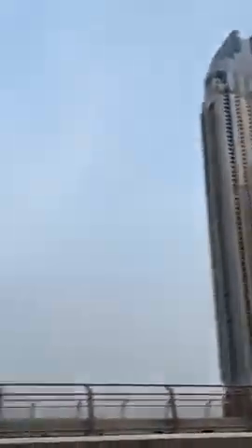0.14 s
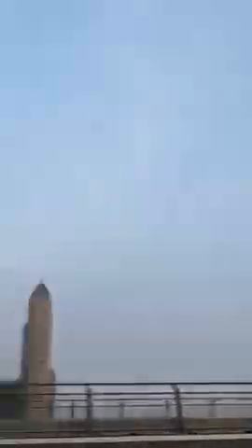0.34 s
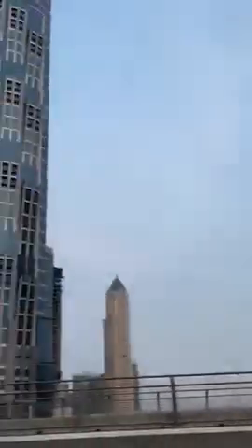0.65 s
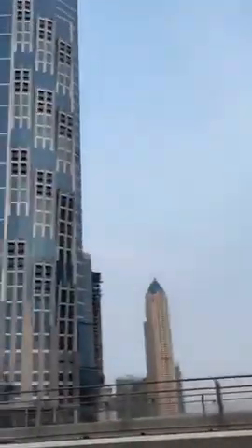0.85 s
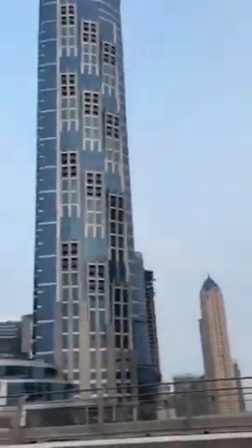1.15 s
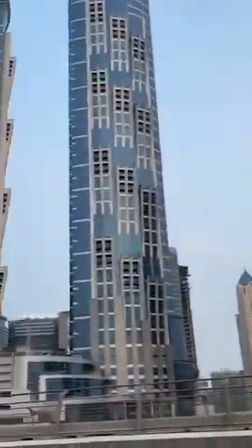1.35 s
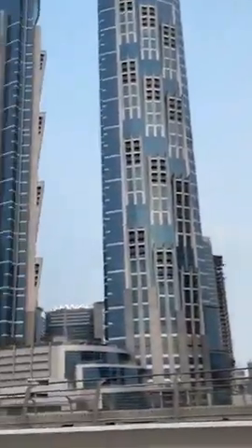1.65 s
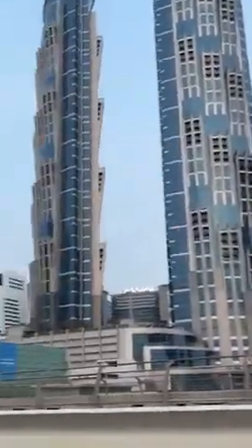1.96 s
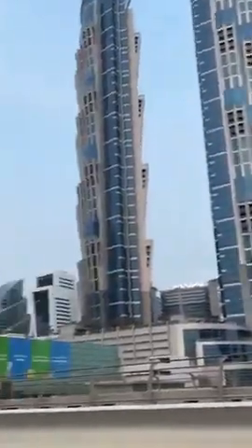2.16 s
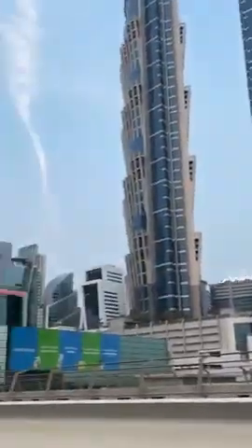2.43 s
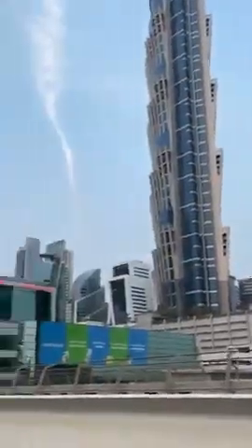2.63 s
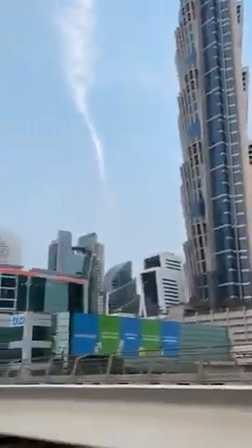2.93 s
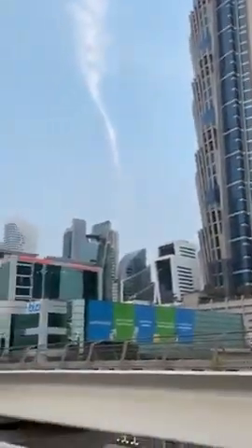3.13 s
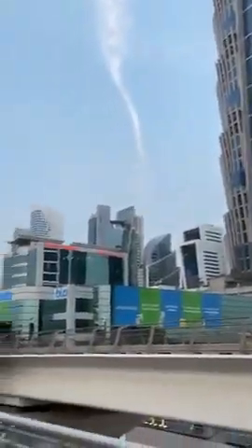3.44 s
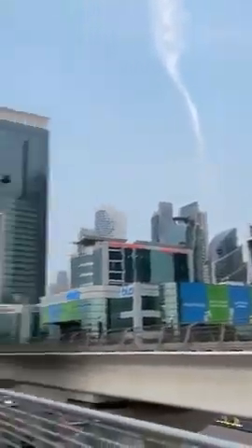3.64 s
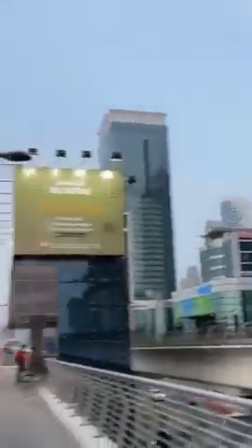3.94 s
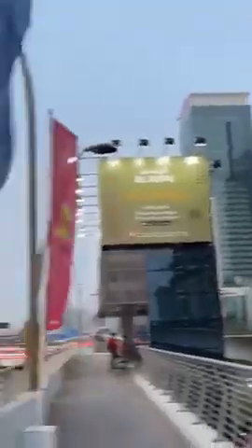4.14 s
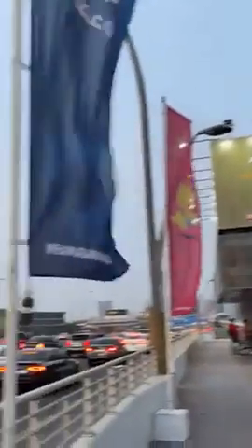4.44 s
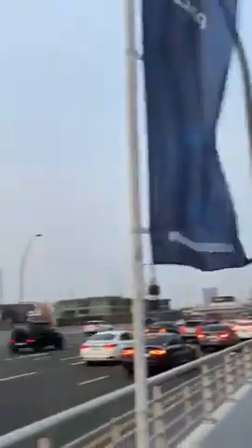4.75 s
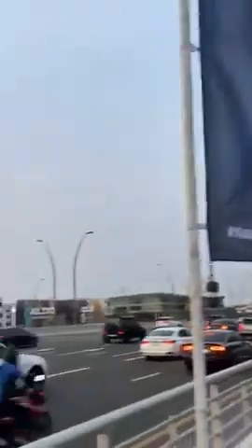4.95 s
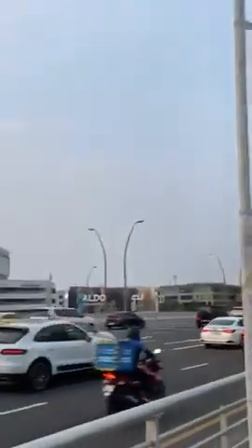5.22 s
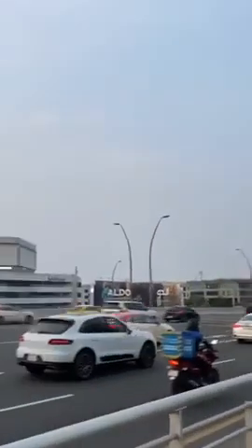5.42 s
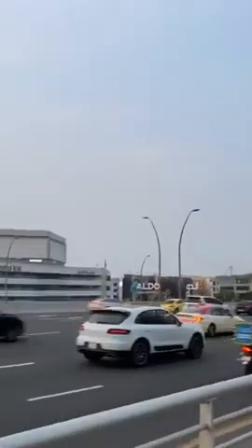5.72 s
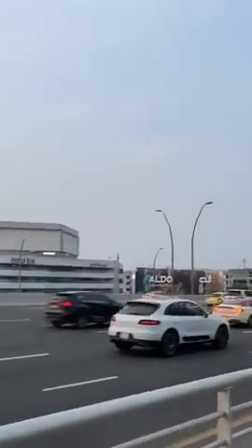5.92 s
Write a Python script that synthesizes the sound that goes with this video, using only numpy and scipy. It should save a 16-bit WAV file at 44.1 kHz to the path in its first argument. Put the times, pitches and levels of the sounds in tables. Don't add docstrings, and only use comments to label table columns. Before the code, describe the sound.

Dense passing traffic heard through a gating phone microphone, low rumble dropping to faint hiss, then bumpy roars breaking through and easing to the end.

```python
import sys
import numpy as np
from scipy import signal
from scipy.fft import rfft, irfft
from scipy.io import wavfile
from scipy.ndimage import uniform_filter1d

SR = 44100
rng = np.random.default_rng(int(sys.argv[2]) if len(sys.argv) > 2 else 0)


def log_audio(samples):
    frames = np.atleast_2d(samples).T
    limited = np.clip(frames, -1, 1)
    pcm = np.round(limited * 32767).astype(np.int16)
    wavfile.write(sys.argv[1], SR, pcm)


def voltage_ratio(decibels):
    exponent = np.asarray(decibels, float) / 20
    return 10 ** exponent


N = 268216
FRAME, HOP = 512, 128

# (opening time [s], shutting time [s])
OPEN = [
    (0, .358),
    (.94, 1.09),
    (1.268, 1.4),
    (1.435, 2.272),
    (2.712, 2.838),
    (3.232, 3.452),
    (3.462, 4.192),
    (4.302, 4.706),
    (4.825, 6.08),
]
# (rumble [dB], roar [dB], whine [dB], hiss [dB])
BEDS = [(-59, -61.5, -70, -96), (-106, -65, -70.5, -101), (-87, -48, -64, -91),
        (-56.5, -49.5, -55.5, -69.5), (-47.5, -43.5, -64, -69), (-77, -56, -67, -71),
        (-57.5, -45, -79, -76), (-53.5, -63, -59, -72.5), (-50.5, -52.5, -67, -79.5)]
# (rumble centre [Hz], rumble width [Hz], roar width [Hz])
SHAPES = [(237, 70, 127), (400, 190, 34), (243, 25, 39), (255, 84, 123), (236, 107, 124), (380, 710, 150),
          (326, 76, 142), (297, 140, 118), (285, 310, 160)]
# (time [s], peak level [dB], ring frequency [Hz])
KICKS = [(0.205, -32.5, 961), (0.331, -35, 953), (1.05, -40, 937), (1.272, -31.5, 866), (1.44, -28.5, 886),
         (1.605, -26.5, 923), (1.619, -26, 920), (1.691, -31, 926), (1.787, -30, 789), (1.857, -24.5, 724),
         (1.912, -29, 923), (1.931, -24.5, 877), (2.027, -26, 947), (2.067, -21.5, 802), (2.084, -29, 896),
         (2.21, -24, 848), (2.743, -28.5, 807), (3.356, -34, 942), (3.466, -27, 756), (3.674, -24, 678),
         (3.775, -23, 665), (3.887, -21, 740), (3.991, -28.5, 692), (4.178, -31, 576), (4.344, -31.5, 598),
         (4.473, -32.5, 738), (4.626, -25, 643), (4.857, -34, 622), (4.989, -46, 657), (5.306, -30.5, 867)]


def road():
    return rng.standard_normal(N)


def suppressor(x):
    # (foot [Hz], top [Hz])
    hiss_edges = [(6500, 8100), (3500, 7000), (3600, 7600), (3200, 7100), (4100, 9100), (4000, 10900),
                  (3600, 9050), (3700, 9000), (3600, 8800)]
    hz, t, spectra = signal.stft(x, SR, nperseg=FRAME, noverlap=FRAME - HOP)
    hz = np.maximum(hz, 1)
    stretch = np.maximum(np.searchsorted(np.array(OPEN)[:, 0], t) - 1, 0)
    foot_hz, top_hz = np.array(hiss_edges)[stretch].T

    power = engine_rumble(hz, t, stretch) + tyre_roar(hz, t, stretch) + tread_whine(hz, t, stretch)
    power = power + road_hiss(hz, t, stretch, foot_hz, top_hz)
    power = power * (hz[:, None] < np.maximum(top_hz + HOP, 9000))
    power = power + islands(hz, t)

    patch_db = patches(hz, len(t), depth_db=2.5, hold=14)
    patch_db = patch_db * np.clip(hz / 2500, 1, 1.6)[:, None]
    mask = np.sqrt(power * len(hz)) * voltage_ratio(patch_db)
    masked = favour_loud(spectra, strength=0.11, bins=5) * mask
    passed = signal.istft(masked, SR, nperseg=FRAME, noverlap=FRAME - HOP)[1][:N]
    bass_cut = signal.cheby2(4, 15.5, 151.2, "high", fs=SR, output="sos")
    return signal.sosfilt(bass_cut, passed)


def engine_rumble(hz, t, stretch):
    # (time [s], hold [s], level [dB])
    rumble_swells = [(0, 0.063, -42), (.083, 0.0059, -41.5), (.2, 0.082, -54), (.31, 0.023, -52.5),
                     (1.46, 0.03, -56), (1.85, 0.029, -52), (2.0, 0.035, -49), (2.18, 0.071, -52),
                     (3.47, 0.072, -44.5), (3.78, 0.0075, -61), (3.955, 0.016, -54), (4.035, 0.0083, -55),
                     (4.12, .02, -49), (4.6, .09, -47), (5.1, 0.024, -68), (5.32, 0.09, -49.5),
                     (5.58, 0.018, -44.5), (5.85, 0.28, -49.5)]
    deep_bass_db = [-1, -4, -14, 0, -11, -6, 6, -9, -6.5]
    bed_db = np.array(BEDS)[stretch, 0]
    centre_hz, width_hz, _ = np.array(SHAPES)[stretch].T
    gain, = swells(rumble_swells, (1100, 900), bed_db, t)
    deep = voltage_ratio(np.outer(hz < 130, np.array(deep_bass_db)[stretch]))
    band = hump(hz, centre_hz, width_hz, skirt_db=-4.5)
    return (gain * deep * band) ** 2 / (1 + (hz[:, None] / 700) ** 8)


def tyre_roar(hz, t, stretch):
    # (time [s], hold [s], level [dB], centre [Hz])
    roar_swells = [(.02, 0.012, -47.5, 910), (.21, 0.062, -47, 903), (.334, 0.016, -45, 976),
                   (1.05, 0.018, -51.5, 893), (1.272, 0.0036, -32.5, 883), (1.37, 0.023, -49, 878),
                   (1.44, 0.016, -44, 820), (1.58, 0.033, -44.5, 830), (1.7, 0.022, -43.5, 867),
                   (1.785, 0.015, -47, 815), (1.92, 0.025, -40.5, 830), (2.01, 0.091, -40, 845),
                   (2.14, 0.099, -43, 868), (2.795, 0.035, -37, 738), (3.35, 0.028, -57, 938),
                   (3.475, 0.11, -40.5, 722), (3.77, 0.01, -38.5, 690), (3.885, 0.017, -39, 720),
                   (3.98, 0.014, -40.5, 746), (4.065, 0.019, -46, 735), (4.175, 0.005, -40.5, 697),
                   (4.388, 0.025, -45, 644), (4.475, 0.026, -39.5, 717), (4.585, 0.034, -41, 723),
                   (4.862, 0.023, -46, 600), (4.99, 0.068, -48, 676), (5.14, 0.054, -47.5, 710),
                   (5.33, 0.23, -51, 710), (5.52, 0.085, -47.5, 690), (5.93, 0.048, -48, 650)]
    lag_s, wake_db_per_s = 0.018, 499
    asleep_s = np.maximum(np.array(OPEN)[stretch, 0] + lag_s - t, 0)
    bed_db = np.array(BEDS)[stretch, 1] - wake_db_per_s * asleep_s
    gain, centre_hz = swells(roar_swells, (540, 333), bed_db, t)
    dip = 1
    for s in np.array(KICKS)[:, 0]:
        dip = dip * (1 - 0.45 * np.exp(-((t - s + 0.003) / 0.008) ** 2))
    width_hz = np.array(SHAPES)[stretch, 2]
    band = hump(hz, centre_hz, width_hz, skirt_db=-23.5)
    return (dip * gain * band) ** 2 * above_rumble(hz)


def tread_whine(hz, t, stretch):
    # (time [s], hold [s], level [dB], centre [Hz])
    whine_swells = [(0, 0.0089, -63, 1750), (1.33, .01, -57, 2170), (1.445, 0.19, -55.5, 2270),
                    (1.7, 0.12, -54, 2070), (1.85, 0.13, -50.5, 2030), (2.07, 0.095, -50, 1950),
                    (2.19, 0.044, -45.5, 1710), (2.26, 0.03, -49.5, 1970), (2.79, .02, -58.5, 2400),
                    (3.244, 0.013, -59, 1440), (3.775, 0.098, -55, 2200), (3.95, 0.071, -55.5, 2120),
                    (4.06, 0.062, -51.5, 2160), (4.13, 0.074, -52, 1760), (4.39, 0.02, -52.5, 1910),
                    (4.52, 0.17, -59.5, 1870), (5.09, 0.014, -63, 2090), (5.26, .02, -65, 2000),
                    (5.64, 0.14, -62, 2120), (5.82, 0.12, -58.5, 1920), (6.0, 0.05, -56.5, 1730)]
    gain, centre_hz = swells(whine_swells, (500, 380), np.array(BEDS)[stretch, 2], t)
    return (gain * hump(hz, centre_hz, 286, skirt_db=-35.0)) ** 2 * above_rumble(hz)


def road_hiss(hz, t, stretch, foot_hz, top_hz):
    # (time [s], hold [s], level [dB], centre [Hz])
    hiss_swells = [(0, 0.077, -71, 7050), (1.333, .008, -68.5, 4400), (1.445, .04, -69, 4430),
                   (1.6, 0.02, -73, 5300), (1.9, 0.13, -69.5, 4970), (2.066, 0.03, -61.5, 4900),
                   (2.2, 0.054, -66.5, 4664), (2.718, 0.032, -61.5, 5440), (2.82, 0.013, -61, 4700),
                   (3.244, 0.079, -65.5, 4800), (3.38, 0.016, -69.5, 7640), (3.72, 0.092, -69.5, 6200),
                   (4.316, 0.088, -82, 4930), (4.52, 0.052, -72.5, 4350), (5.3, .2, -84, 4500)]
    gain, centre_hz = swells(hiss_swells, (410, 490), np.array(BEDS)[stretch, 3], t)
    f = hz[:, None]
    band = 1 / (1 + (f / top_hz) ** 80) / (1 + (foot_hz / f) ** 16)
    band = band + voltage_ratio(-12.5) ** 2 * (f > top_hz) * (f < 9000)
    bump = voltage_ratio(1.5) * np.exp(-((f - centre_hz) / 290) ** 2)
    shape = (bump + 1) * band / f ** 3.5
    return gain ** 2 * shape / np.sum(shape, axis=0)


def islands(hz, t):
    # (time [s], length [s], centre [Hz], width [Hz], level [dB])
    island_rows = [(0.002, 0.018, 250, 37.8, -31), (0.038, 0.039, 7050, 350, -59),
                   (0.043, 0.034, 550, 120, -51), (0.286, 0.0062, 460, 97.2, -47.5),
                   (0.967, 0.017, 680, 60, -70.5), (1.064, 0.017, 630, 59.6, -72.5),
                   (1.341, 0.019, 255, 49.6, -45), (1.786, 0.016, 1120, 90, -44),
                   (2.021, 0.084, 1216, 106.5, -48), (2.274, 0.042, 2530, 216, -49.5),
                   (2.4, 0.19, 2320, 350, -61), (2.74, 0.05, 9960, 700, -81),
                   (2.788, 0.067, 4570, 250, -65), (2.791, 0.066, 8600, 300, -71),
                   (2.793, 0.082, 6250, 300, -65), (3.222, 0.034, 9500, 800, -81),
                   (3.27, 0.03, 4960, 378, -64), (3.374, 0.0073, 8620, 120, -60),
                   (3.719, 0.13, 7550, 704, -76.5), (3.784, 0.018, 587, 121, -40),
                   (3.853, 0.23, 392, 59.7, -52.5), (4.343, 0.016, 4700, 250, -69.5),
                   (4.367, 0.067, 8150, 600, -74), (4.598, .07, 4250, 300, -68.5)]
    power = 0
    for s, length, centre_hz, width_hz, db in island_rows:
        bell = np.exp(-((t - s) / length) ** 4)
        power = power + (voltage_ratio(db) * hump(hz, centre_hz, width_hz, skirt_db=-57) * bell) ** 2
    return power


def above_rumble(hz):
    return 1 / (1 + (480 / hz[:, None]) ** 16)


def swells(rows, slopes, bed_db, t):
    s, hold, db, *centre_hz = np.transpose(rows)[:, :, None]
    rise, fall = slopes
    away_db = rise * np.maximum(s - t, 0) + fall * np.maximum(t - s - hold, 0)
    power = voltage_ratio(db - away_db) ** 2 + 1e-300
    total = np.sum(power, axis=0)
    gain = gate(t) * np.sqrt(voltage_ratio(bed_db) ** 2 + total)
    return [gain] + [np.sum(power * c, axis=0) / total for c in centre_hz]


def gate(t):
    start, end = np.transpose(OPEN)[:, :, None]
    after = np.maximum(t - end, 0)
    fall_db = np.maximum(-1272 * after, -18 - 400 * after)
    return np.max(voltage_ratio(fall_db) * (t >= start + 0.004), axis=0)


def hump(hz, centre_hz, width_hz, skirt_db):
    away = ((hz[:, None] - centre_hz) / width_hz) ** 2
    shape = np.exp(-away / 2) + voltage_ratio(skirt_db) / np.sqrt(1 + away)
    return shape / np.sqrt(np.sum(shape ** 2, axis=0))


def patches(hz, frames, depth_db, hold):
    band = np.round(11 * np.log2(1 + hz / 700)).astype(int)
    wobble = rng.standard_normal((band.max() + 1, frames))
    wobble = uniform_filter1d(wobble, size=hold, axis=1)
    return depth_db * (wobble / np.std(wobble))[band]


def favour_loud(spectra, strength, bins):
    patch = uniform_filter1d(np.abs(spectra) ** 2, size=bins, axis=0)
    lifted = spectra * (patch / np.mean(patch)) ** strength
    return lifted * np.sqrt(np.mean(np.abs(spectra) ** 2) / np.mean(np.abs(lifted) ** 2))


def kicks():
    rise_s = 0.0027
    out, t = np.zeros(N + SR), np.arange(SR // 20) / SR
    swell = (t / rise_s * np.exp(1 - t / rise_s)) ** 2
    for s, peak_db, ring_hz in KICKS:
        out[int(s * SR):][:len(t)] += voltage_ratio(peak_db - 8.0) * swell * np.sin(2 * np.pi * ring_hz * t)
    return signal.sosfilt(signal.butter(4, 450, "high", fs=SR, output="sos"), out[:N])


def residue():
    # (time [s], level [dB], treble lift [dB])
    course = [(0.0, -58, 1.5), (0.44, -60, 1.5), (1.18, -58.5, -2), (1.341, -54.5, -7.5), (1.64, -57, -2.5),
              (2.2, -57, -2.5), (2.49, -58.5, 5), (3.2, -61, 5.5), (4.0, -56, 3), (4.3, -61.5, -3),
              (4.54, -53.5, -10), (4.7, -61, 1), (5.64, -60, -1.5), (6.08, -60.5, 1.5)]
    # (frequency [Hz], density [dB per Hz])
    colour = [(30, -50), (200, -43), (450, -35.5), (690, -27), (790, -8), (860, 2.5), (1200, 0), (2000, -4),
              (3000, -7.5), (4000, -18.5), (6000, -27), (8500, -37), (10500, -42.5), (15500, -97)]
    hz = np.maximum(np.fft.rfftfreq(N, 1 / SR), 1)
    spectrum = rfft(rng.standard_normal(N)) * voltage_ratio(at_hz(colour, hz))
    treble_share = 1 / (1 + (4200 / hz) ** 4)
    body = irfft(spectrum * (1 - treble_share), N)
    treble = irfft(spectrum * treble_share, N)
    s, *columns = np.transpose(course)
    level_db, lift_db = [np.interp(np.arange(N) / SR, s, c) for c in columns]
    return (body + voltage_ratio(lift_db) * treble) / np.std(body) * voltage_ratio(level_db - 2.0)


def at_hz(points, hz):
    point_hz, value = np.transpose(points)
    return np.interp(np.log(hz), np.log(point_hz), value)


def scene():
    return (suppressor(road()) + kicks() + residue())[None]


def circuit_noise():
    treble = signal.butter(2, 8000, "high", fs=SR, output="sos")
    return voltage_ratio(-90) * signal.sosfilt(treble, rng.standard_normal(N))


def thin_treble(x, margin_db):
    # (frequency [Hz], threshold [spreads])
    starved_above = [(4000, 3.), (7000, 2.2), (8500, 1.3), (10000, .9), (10600, 4.)]
    hz, t, spectra = signal.stft(x, SR, nperseg=2 * FRAME)
    power = uniform_filter1d(np.abs(spectra) ** 2, size=9, axis=0)
    power = uniform_filter1d(power, size=5, axis=1)
    level_db = 10 * np.log10(power + 1e-20)

    chance = rng.standard_normal((len(hz) // 6 + 1, len(t)))
    chance = uniform_filter1d(chance, size=8, axis=1).repeat(6, axis=0)[:len(hz)]
    chance = chance / np.std(chance)
    below_db = np.roll(level_db, 12, axis=0)
    masked = below_db - level_db + 2 * chance > margin_db
    starved = chance > at_hz(starved_above, hz + 1)[:, None]
    dropped = (masked & (hz > 2400)[:, None]) | starved
    return signal.istft(spectra * np.where(dropped, 0.03, 1), SR, nperseg=2 * FRAME)[1][:N]


def band_limit(x):
    return signal.sosfilt(signal.butter(12, 15750, fs=SR, output="sos"), x)


def record(dry):
    mix = thin_treble(dry[0] + circuit_noise(), margin_db=15.5)
    return band_limit(mix[None])


dry = scene()
out = record(dry)
log_audio(out)
```